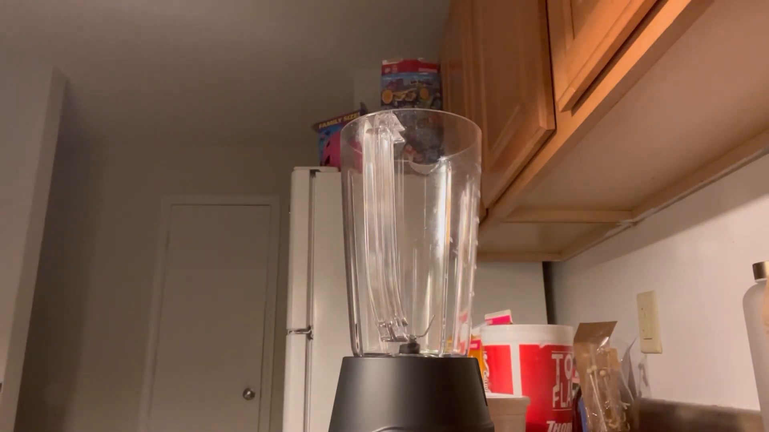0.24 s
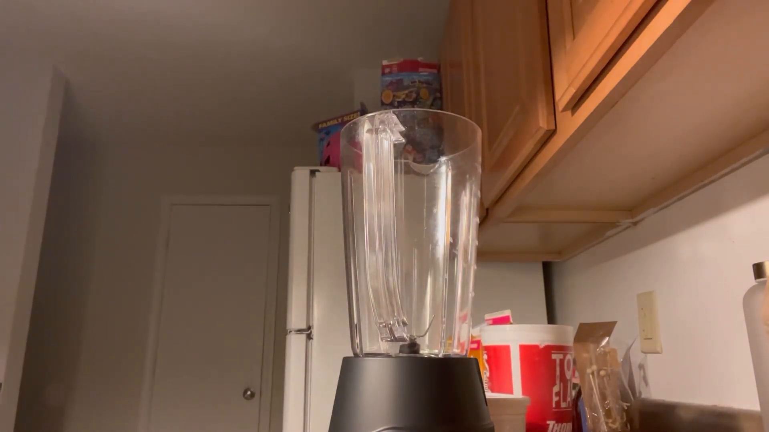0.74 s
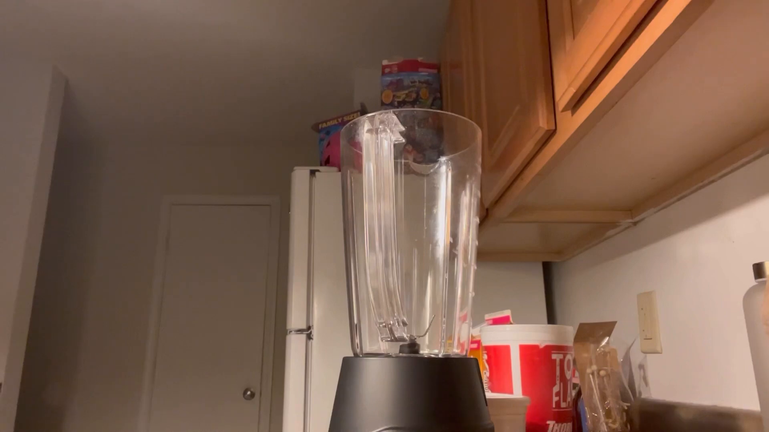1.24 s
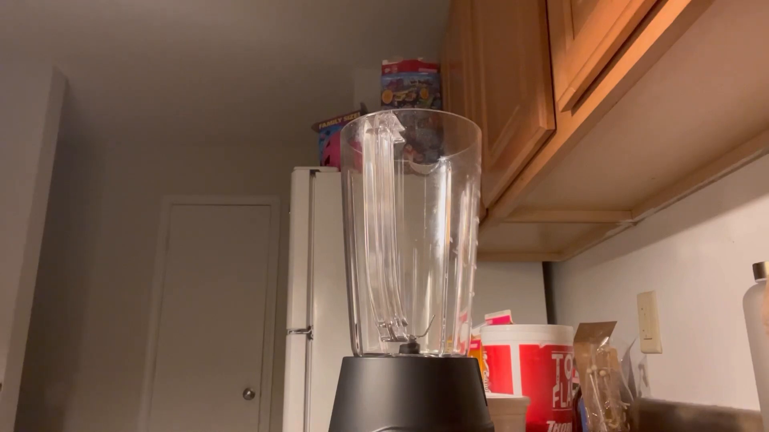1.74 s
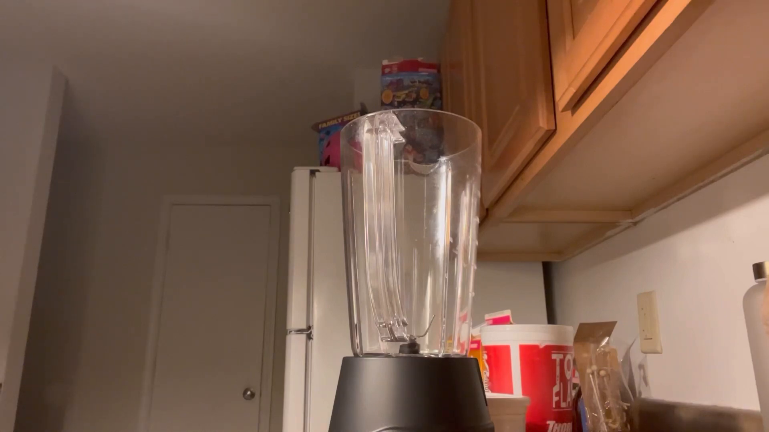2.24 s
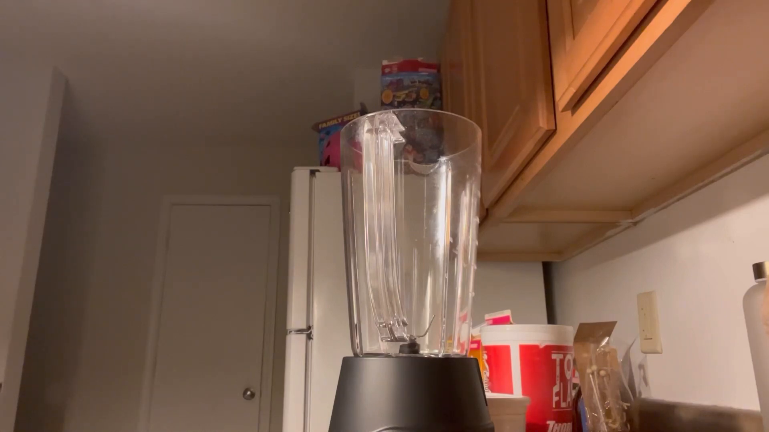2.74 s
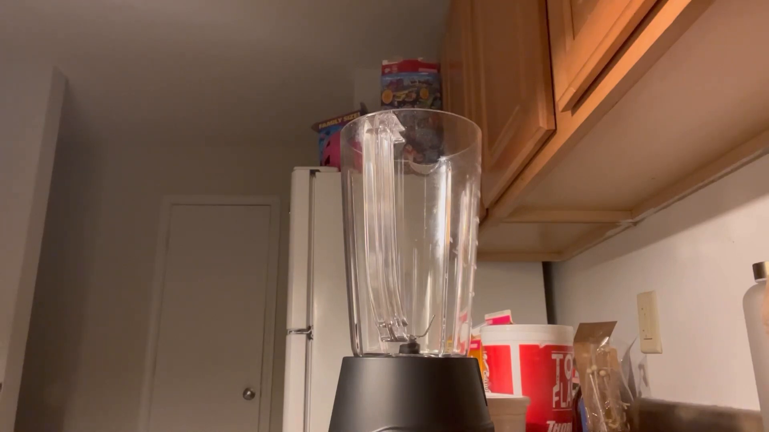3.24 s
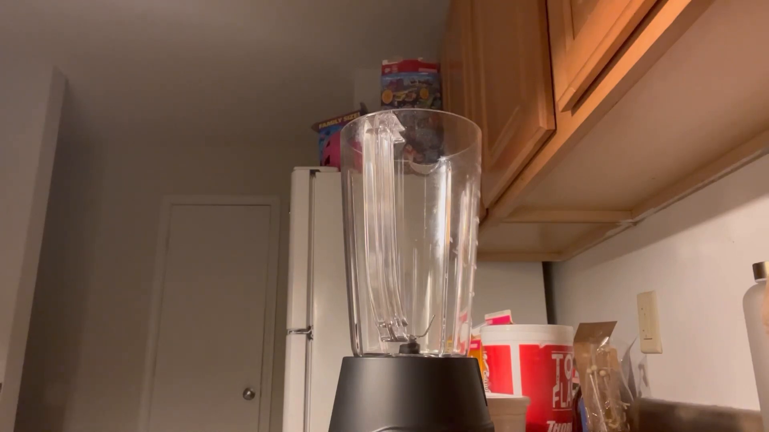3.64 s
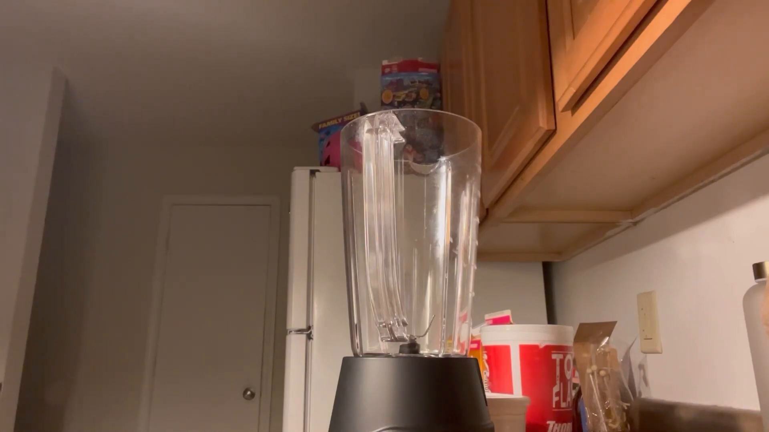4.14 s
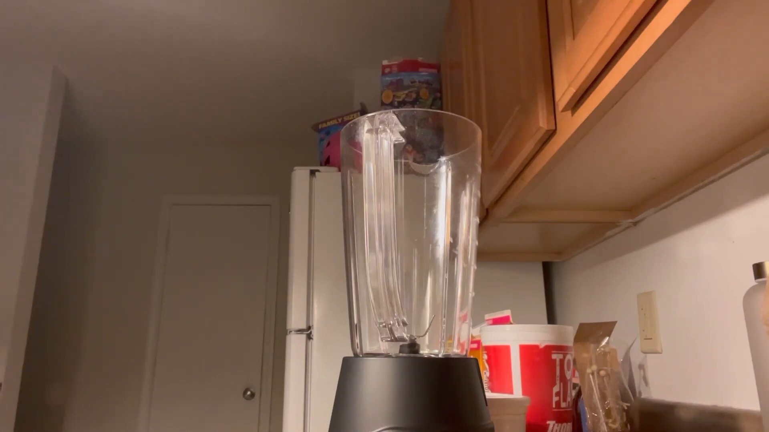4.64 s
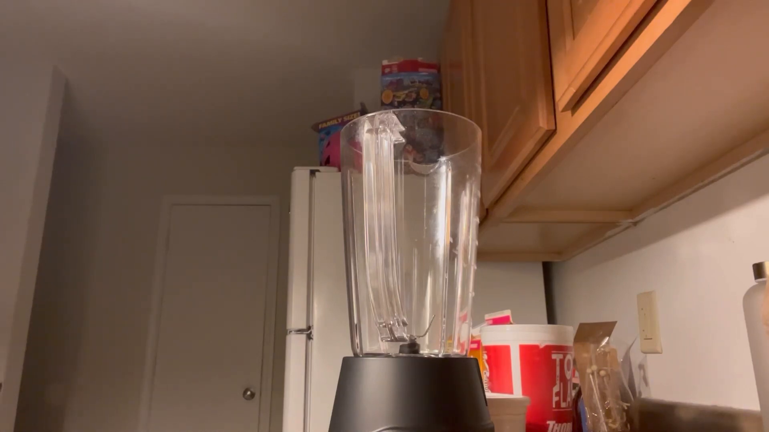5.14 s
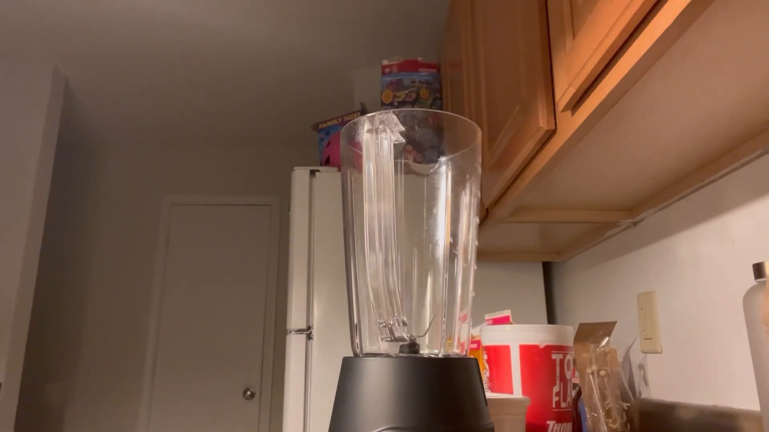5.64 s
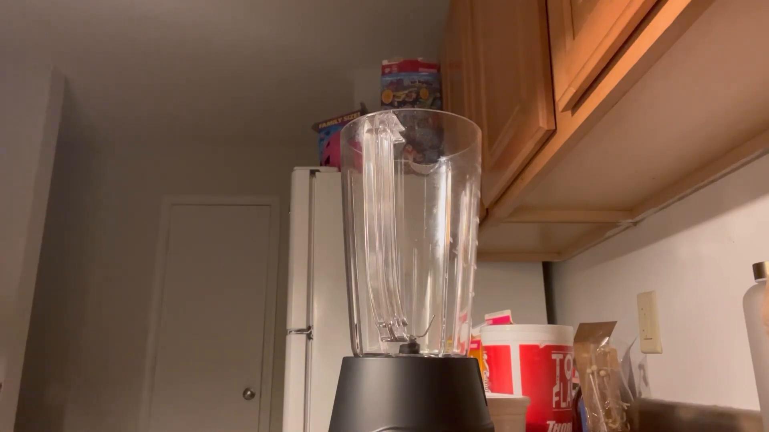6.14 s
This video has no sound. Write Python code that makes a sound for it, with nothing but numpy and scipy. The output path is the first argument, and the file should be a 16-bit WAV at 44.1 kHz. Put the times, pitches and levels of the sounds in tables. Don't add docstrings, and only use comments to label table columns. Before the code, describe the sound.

Cutlery and plastic handles scrape and clatter in a drawer, followed by a near lull, renewed clacking and one loud wooden slam over faint refrigerator rumble.

```python
import sys
import numpy as np
from scipy import signal
from scipy.fft import rfft, irfft, next_fast_len
from scipy.io import wavfile
from scipy.ndimage import uniform_filter1d, map_coordinates

SR = 44100
rng = np.random.default_rng(int(sys.argv[2]) if len(sys.argv) > 2 else 0)


def generate_wav(sig):
    pcm = np.round(np.clip(np.atleast_2d(sig).T, -1, 1) * 32767).astype(np.int16)
    wavfile.write(sys.argv[1], SR, pcm)


def level_to_linear(level):
    exponent = np.asarray(level, float) / 20
    return 10 ** exponent


N = 281530
T = np.arange(SR // 5) / SR

# [f/Hz, width/Hz, level/dB]
BOX_MODES = [(113.2, 17.9, 3), (215, 32, 2), (275, 49.3, 2), (363.4, 55, 1), (385.7, 65, -1.5),
             (466, 89, -4.5), (630, 131, -8.5), (770, 40, -21)]
# [f/Hz, level per Hz/dB]
PLASTIC_COLOUR = [(210, -10.5), (380, 0.5), (520, -4), (800, 0.5), (1000, -2.5), (1500, -4.5), (2300, -5),
                  (3200, -12), (4500, -17.5), (7000, -26), (13000, -101)]
# [f/Hz, level per Hz/dB]
FIZZ_COLOUR = [(2000, -5), (3500, 1), (4800, -2), (6500, -2), (7800, -5.5), (9500, -5.5), (11000, -16),
               (11900, -26), (13200, -20.5), (14200, -20), (15300, -19.5), (15800, -58.5)]
# [f/Hz, width/Hz, level/dB]
HIGH_MODES = [(10770, 1300, -2.5), (12800, 500, -7.5), (13300, 1800, -3.5), (15000, 460, -16)]


def unit(x):
    return x / np.sqrt(np.mean(x ** 2) + 1e-20)


def along(points, hz):
    f, v = np.transpose(points)
    return np.interp(np.log(hz + 1), np.log(f + 1), v)


def wobble(rate):
    knots = rng.standard_normal(int(N * rate / SR) + 4)
    return map_coordinates(knots, [np.arange(N) * rate / SR])


def filtered(x, response):
    m = next_fast_len(N + SR // 2)
    gain = response(np.fft.rfftfreq(m, 1 / SR))
    gain = gain / np.sqrt(np.mean(abs(gain) ** 2, axis=-1, keepdims=True))
    return irfft(rfft(x, m) * gain, m)[..., :N]


def modes(table):
    def response(f):
        total = 0
        for k, (centre, width, db) in enumerate(table):
            damping = 1j * f * width
            total = total + (-1) ** k * level_to_linear(db) * damping / (centre * centre - f * f + damping)
        return total
    return response


def high_response(f):
    return modes(HIGH_MODES)(f) ** 2


def colour(points):
    return lambda f: level_to_linear(along(points, f))


def grit(rate, spread_db):
    hits = rng.random(N) < rate / SR
    return unit(hits * rng.standard_normal(N) * level_to_linear(spread_db * rng.standard_normal(N)))


def add(track, s, sound):
    part = track[round(s * SR):][:len(sound)]
    part += sound[:len(part)]


def burst(length, rise=0.0036):
    lumps = np.repeat(rng.standard_normal(len(T) // 64 + 1), 64)[:len(T)]
    decay = level_to_linear(3.55 * lumps - 60 * T / max(length, .002))
    return rng.standard_normal(len(T)) * decay * (1 - np.exp(-T / min(rise, length / 4)))


def refrigerator():
    # [f/Hz, level per Hz/dB]
    hum = [(12, -55), (20, -25.5), (49, 5), (76, 10.5), (95, -4), (161, -11), (288, -30), (414, -21.5),
           (489, -22), (1160, -46.5), (3930, -51.5), (6300, -48), (9830, -45.5), (10700, -78), (15300, -80)]
    # [f/Hz, level/dB]
    whine = [(59.2, -59), (10551, -104), (11050, -103)]
    hum_db = -56
    sound = level_to_linear(hum_db + 0.47 * wobble(1.2)) * filtered(rng.standard_normal((2, N)), colour(hum))
    for hz, db in whine:
        sound = sound + level_to_linear(db + 2.3 * wobble(7.6)) * np.sin(2 * np.pi * hz * np.arange(N) / SR)
    return sound


def strokes():
    # [start t/s, length t/s, scrape level/dB, box level re scrape/dB, steel level re scrape/dB]
    stroke_table = [(0, 0.23, -59, 0.5, -6), (0.23, 0.24, -58.5, 12.5, -6.5),
                    (0.483, 0.28, -65.5, 10, -8.5), (0.789, 0.11, -62.5, 2, -6),
                    (0.866, 0.087, -60, -8, -2), (0.97, 0.046, -63, 0, 1.5), (1.036, 0.057, -58.5, 5, -9),
                    (1.271, 0.11, -70.5, 14, -6), (1.323, 0.17, -53, 2, -11.5),
                    (1.48, 0.073, -55.5, 3.5, -5), (1.582, 0.32, -64, 6.5, -7), (1.843, 0.16, -62, 11, -6),
                    (2.01, 0.44, -66, 6.5, -3), (2.447, 0.18, -56.5, 10.5, -4.5),
                    (2.617, 0.13, -62.5, 4, 1.5), (2.841, 0.057, -61.5, 6, -6),
                    (3.839, 0.068, -59, -7, -14.5), (3.918, 0.047, -65.5, 10, -15),
                    (4.025, 0.12, -54.5, 3.5, -22), (4.166, 0.1, -60.5, 3.5, -5),
                    (4.29, 0.11, -64.5, 4.5, -2), (4.36, 0.26, -65.5, 3, -3), (4.596, 0.086, -55, 6.5, -25),
                    (4.704, 0.12, -67.5, -5.5, -31), (5.057, 0.07, -65, -3.5, -3),
                    (5.235, 0.14, -49, -0.5, -22), (5.404, 0.079, -52.5, 18, -15),
                    (5.548, 0.17, -65.5, 3, -26), (5.71, 0.39, -74.5, 5.5, -4), (6.087, 0.095, -70, 0, -15),
                    (6.141, 0.15, -69.5, 5.5, -29), (6.284, 0.076, -71, 6.5, -11)]
    rise_s, fall_db_per_s = 0.03, 341
    rest_db, rest_weight_db, rest_steel_db = -87, 8, -3
    s, length, db, weight_db, steel_db = np.transpose(stroke_table)
    t = np.arange(0, N / SR + .002, .002)
    since = t - s[:, None]
    fall = level_to_linear(-fall_db_per_s * np.maximum(since - length[:, None], 0))
    shape = np.clip(since / rise_s, 0, 1) ** 2 * fall
    rest = level_to_linear(rest_db + np.array([[rest_weight_db], [0], [rest_steel_db]]))
    gains = level_to_linear(db + np.array([weight_db, 0 * db, steel_db])) @ shape + rest
    return [np.interp(np.arange(N) / SR, t, g) for g in gains]


def sliding():
    # [f/Hz, level per Hz/dB]
    counter = [(25, -22.5), (45, -8), (62, 5.5), (85, -2), (110, -3), (160, -69)]
    shake_db, shake_wobble_db = -51.5, 1.5
    shake_follows, shake_lag_s = 0.2, 0.33
    on_box, on_plastic, on_steel = strokes()
    slow_drive = uniform_filter1d(on_box, size=int(shake_lag_s * SR) + 1) / level_to_linear(-53.5)
    shake = level_to_linear(shake_db + shake_wobble_db * wobble(5)) * slow_drive ** shake_follows
    worktop = shake * filtered(rng.standard_normal(N), colour(counter))
    jerk = wobble(25)
    box = on_box * level_to_linear(2.94 * wobble(15)) * filtered(grit(500, 2.25), modes(BOX_MODES))
    scrape = on_plastic * level_to_linear(1.7 * jerk) * filtered(grit(700, 4.7), colour(PLASTIC_COLOUR))
    fizz_gain = on_steel * level_to_linear(1.4 * jerk + 0.453 * wobble(23))
    fizz = fizz_gain * filtered(grit(800, 4.6), colour(FIZZ_COLOUR))
    edges = on_steel * level_to_linear(-19.5 + 2.9 * wobble(30)) * filtered(grit(600, 4), high_response)
    return worktop + box + scrape + fizz + edges


def thuds():
    # [t/s, peak level/dB, ring f/Hz, t60/s]
    blows = [(0.004, -30.5, 125, 0.049), (0.049, -39.5, 226, 0.096), (0.186, -37.5, 215, 0.079),
             (0.284, -36.5, 227, 0.084), (0.358, -55, 288, 0.06), (0.428, -37.5, 153, 0.067),
             (0.689, -38, 103, 0.04), (0.882, -35, 215, 0.062), (.904, -31.5, 151, 0.038),
             (1.099, -38, 148, 0.086), (1.16, -46.5, 266, 0.086), (1.065, -40, 280, 0.12),
             (1.399, -18.5, 250, 0.036), (1.415, -33.5, 203, .09), (1.44, -42, 276, 0.071),
             (1.519, -38, 235, 0.056), (1.721, -51, 232, 0.25), (1.891, -32.5, 307, 0.073),
             (2.2, -42, 142, 0.062), (2.49, -33.5, 221, 0.068), (2.673, -31, 275, 0.04),
             (3.854, -38.5, 234, 0.076), (3.929, -41, 329, 0.16), (4.209, -34, 215, 0.065),
             (4.232, -38.5, 159, 0.071), (4.409, -41.5, 311, 0.083), (4.42, -34, 248, 0.045),
             (4.445, -37.5, 317, 0.05), (4.636, -34, 197, 0.032), (5.117, -34.5, 275, 0.039),
             (5.184, -19, 250, 0.059), (5.188, -12, 255, 0.064), (5.2, -22.5, 120, 0.14),
             (5.233, -25, 282, .03), (5.207, -14.5, 268, 0.043), (5.354, -26, 264, 0.12),
             (5.446, -19, 113.6, 0.14), (5.509, -23.5, 98.5, 0.16), (5.5, -30, 200, 0.05),
             (5.54, -35, 226, 0.073), (5.748, -40, 106, 0.059), (6.178, -42.5, 240, 0.074)]
    # [t/s, peak level/dB, ring f/Hz, t60/s]
    more_blows = [(2.491, -34, 515, 0.04), (2.535, -36, 580, 0.08), (2.599, -44, 530, 0.064),
                  (2.699, -52, 468, 0.069), (5.23, -18, 354, 0.11), (5.445, -27, 650, 0.042),
                  (5.58, -36, 693, 0.034), (1.42, -25.5, 117, 0.12), (3.8, -49, 113, 0.08),
                  (5.19, -17, 173, 0.12), (5.92, -42, 100, 0.1), (5.447, -15.5, 245.4, 0.067),
                  (4.372, -41, 290, 0.27), (2.56, -38, 777, 0.037), (4.632, -36, 205, 0.045)]
    second_ratio, second_db = (1.212, 1.5), -7.5
    panel, shake = np.zeros((2, N))
    for s, db, hz, t60 in list(blows) + list(more_blows):
        neighbour_hz = hz * rng.uniform(*second_ratio)
        swing = np.sin(2 * np.pi * hz * T) + level_to_linear(second_db) * np.sin(2 * np.pi * neighbour_hz * T)
        decay = level_to_linear(db - 0.5 - 70 * T / max(t60, .01))
        add(panel, s, decay * swing * (1 - np.exp(-T / 0.0016)))
        add(shake, s, level_to_linear(db) * min(hz / 200, 1) * burst(0.65 * t60))
    return panel + filtered(shake, lambda f: modes(BOX_MODES)(f) / (1 + 1j * f / 1100) ** 2)


def contacts():
    # [t/s, peak level/dB, ring f/Hz, brightness level/dB]
    clack_table = [(.084, -57, 684, -8), (.165, -42.5, 1880, -7.5), (.295, -44.5, 900, -5.5),
                   (.385, -40, 1660, -29), (.529, -46, 940, -5.5), (.686, -48, 1100, -23),
                   (.769, -54, 3020, -3), (1.507, -33, 1074, -16.5), (1.548, -40, 2270, -6.5),
                   (1.773, -44.5, 925, -15.5), (1.843, -46, 830, -14), (1.868, -34, 945, -15),
                   (1.893, -29.5, 1290, -15), (1.908, -33, 2010, -13), (1.989, -38, 1237, -10.5),
                   (2.318, -44.5, 2920, -24), (2.345, -41.5, 990, -24), (2.362, -45, 1700, -24),
                   (4.189, -36, 800, -10.5), (4.627, -31, 870, -15.5), (5.105, -48.5, 2640, 0),
                   (5.462, -38, 2050, -25), (5.509, -46, 650, -1), (5.584, -45, 630, -26),
                   (5.9, -68, 610, 6), (.431, -32, 997, -19), (2.241, -38, 1116, -18),
                   (2.28, -46, 1210, -24)]
    # [t/s, peak level/dB, ring f/Hz, brightness level/dB]
    ringers = [(.234, -49, 1020, -14), (.843, -52.5, 1266, -3), (1.285, -56.5, 925, -37),
               (1.399, -50, 950, -25), (1.929, -42, 1350, -8.5), (2.168, -47.5, 995, -25),
               (2.489, -52, 1060, -30), (2.55, -39.5, 600, -18.5), (4.369, -38, 778, -7.5),
               (5.114, -35, 766, -15), (5.359, -33.5, 740, -33), (5.943, -65, 2690, 12)]
    # [t/s, peak level/dB, ring f/Hz, brightness level/dB]
    muffled = [
        (.004, -42, 630, -18.5),
        (.554, -41.5, 2250, -11.5),
        (1.057, -45, 860, -13),
        (1.329, -51.5, 1010, -10),
        (2.61, -57, 695, -31),
        (3.851, -40, 1015, -27),
        (4.049, -39.5, 1470, -20),
        (4.118, -31.5, 2140, -12.5),
        (5.437, -28.5, 1730, -12.5),
    ]
    # [t/s, peak level/dB, ring f/Hz, rattle t/s, ring level/dB]
    slam = [
        (5.171, -32.5, 2160, 0.033, -14),
        (5.185, -18, 435, 0.032, -9),
        (5.199, -5.5, 2540, 0.008, -38),
        (5.207, -13.5, 1970, 0.016, -33.5),
        (5.219, -16.5, 770, 0.011, -9),
        (5.233, -22, 1210, .014, 1),
        (5.262, -26, 770, 0.033, -1.5),
    ]
    # [t/s, peak level/dB, ring f/Hz, rattle t/s, ring level/dB]
    rustles = [
        (2.826, -54.5, 2200, 0.14, -14),
        (2.86, -54.5, 3300, 0.1, -8),
        (1.348, -45.5, 920, 0.047, 3),
        (5.955, -60, 4360, 0.078, 17),
    ]
    rows = []
    for table, rattle_s, ring_db in ((clack_table, 0.029, -4.5), (ringers, 0.03, 2.5), (muffled, 0.03, -7)):
        rows += [(*row, rattle_s, ring_db) for row in table]
    for table, bright_db in ((slam, -22.5), (rustles, -7.5)):
        rows += [(s, db, hz, bright_db, rattle_s, ring_db) for s, db, hz, rattle_s, ring_db in table]
    return rows


def clacks():
    ring_cycles = 49
    dull, bright, ring = np.zeros((3, N))
    for s, db, hz, bright_db, rattle_s, ring_db in contacts():
        soft = np.exp(-2 * np.pi * 5 * hz / SR)
        touch = signal.lfilter([(1 - soft) ** 2], [1, -2 * soft, soft ** 2], burst(rattle_s))
        add(dull, s, level_to_linear(db + 4.5) * touch)
        add(bright, s, level_to_linear(db + bright_db + 12.5) * burst(0.78 * rattle_s))
        ratios = np.array([[1], [rng.uniform(1.3, 4.0)], [rng.uniform(2.5, 2.55)]])
        partials = np.sum(np.sin(2 * np.pi * hz * ratios * T) / ratios ** 3.8, axis=0)
        swing = level_to_linear(db + ring_db - 60 * T * hz / ring_cycles) * (1 - np.exp(-T / 0.0004))
        add(ring, s, swing * partials)
    return filtered(dull, colour(PLASTIC_COLOUR)) + filtered(bright, colour(FIZZ_COLOUR)) + ring


def taps():
    # [t/s, peak level/dB, ring f/Hz, t60/s]
    knocked_once = [(.063, -56, 824, 0.018), (.165, -44.5, 2000, 0.013), (.35, -34.5, 310, 0.05),
                    (.385, -49, 1680, .04), (.637, -51, 999, .02), (.64, -47, 302, .05),
                    (.89, -57, 5100, .03), (1.772, -53, 934, .025), (2.169, -60, 1000, 0.015),
                    (2.321, -53, 942, .02), (2.517, -35, 256, .05), (2.575, -33, 293, .06),
                    (2.625, -36, 283, .05), (2.675, -44.5, 281, 0.045), (3.804, -40, 6100, .03),
                    (3.806, -39, 10800, .02), (3.805, -50, 4480, .02), (3.805, -43.5, 2300, .02),
                    (4.05, -58, 985, .02), (4.05, -53.5, 3300, .012), (4.19, -41, 2370, .015),
                    (4.191, -43, 4280, .015), (4.19, -47, 780, 0.033), (4.372, -44, 4480, .02),
                    (4.376, -35, 777, 0.043), (4.413, -33, 265, 0.027), (4.412, -42, 997, .025),
                    (4.53, -38.5, 110, 0.074), (4.627, -46, 900, .06), (4.637, -34, 234, 0.051),
                    (4.645, -40, 2110, 0.023), (4.662, -33.5, 135, 0.056), (5.179, -31, 848, 0.023),
                    (5.192, -18.5, 1544, 0.02), (5.199, -16.5, 1980, 0.011), (5.2, -16, 2750, 0.0087),
                    (5.209, -18, 149, 0.085), (5.255, -34, 201, 0.046), (5.278, -30, 300, .04),
                    (5.446, -31, 800, 0.051), (5.458, -37.5, 1980, .025), (5.466, -20.5, 247, 0.039),
                    (5.514, -24.5, 150, 0.044), (5.552, -32, 160, 0.052), (5.9, -58, 4400, .015),
                    (5.943, -60, 6460, .05), (6.168, -59, 1390, 0.027), (6.33, -67, 6100, .03)]
    # [t/s, peak level/dB, ring f/Hz, t60/s]
    more_knocked = [(.005, -41, 600, .05), (.045, -46, 700, .04), (1.4, -49, 2100, .05), (1.508, -43, 3480, .02),
                    (2.345, -48, 1050, .015), (2.362, -47, 1000, .015), (2.49, -43, 1000, .02),
                    (4.138, -39, 2250, .02), (4.215, -37.5, 230, 0.072), (4.371, -29, 1058, 0.027),
                    (4.392, -42, 1110, .02), (5.357, -29, 272, .06), (5.585, -39, 634, .06),
                    (5.49, -33, 776, 0.045), (5.85, -49.5, 190, 0.11), (6.27, -52, 190, .1)]
    rise_cycles = 0.54
    out = np.zeros(N)
    for s, db, hz, t60 in list(knocked_once) + list(more_knocked):
        ring = level_to_linear(db - 60 * T / max(t60, .004)) * np.sin(2 * np.pi * hz * T)
        add(out, s, ring * (1 - np.exp(-T * hz / rise_cycles)))
    return out


def snaps():
    # [t/s, peak level/dB, ring f/Hz, t60/s]
    hard_touches = [(.431, -34.5, 926, 0.026), (.431, -42, 2510, 0.014), (.446, -37.5, 1660, 0.028),
                    (.458, -43.5, 1020, 0.018), (.843, -50, 2290, .02), (.843, -57, 1270, .03),
                    (.844, -56, 4700, .03), (1.058, -53, 2600, .015), (1.348, -55, 1000, .02),
                    (1.508, -44.5, 2320, 0.022), (1.867, -43.5, 4650, .02), (1.869, -42, 3800, .02),
                    (1.893, -34, 2330, 0.022), (1.909, -34, 2250, 0.011), (1.938, -53, 5870, .05),
                    (2.241, -53.5, 2170, .02), (2.829, -56, 1150, 0.028), (5.214, -26.5, 1240, 0.024),
                    (2.85, -48, 2990, 0.046), (3.211, -70, 2780, 0.015), (3.211, -65, 5900, .02),
                    (3.689, -64, 6030, .02), (4.048, -59, 2820, .015), (4.117, -38.5, 6080, .02),
                    (4.12, -41, 2670, .02), (4.133, -43, 5380, .02), (4.371, -40.5, 1036, 0.03),
                    (4.626, -40.5, 3020, 0.011), (4.629, -53, 950, 0.039), (5.189, -22.5, 780, 0.044),
                    (5.209, -23.5, 1900, .015), (5.222, -23, 1250, 0.021), (5.437, -29.5, 1230, 0.028),
                    (5.437, -33.5, 2730, .015)]
    click_db, click_s = -6.5, .004
    click, ring = np.zeros((2, N))
    for s, db, hz, t60 in hard_touches:
        add(click, s, level_to_linear(db + click_db - 60 * T / click_s) * rng.standard_normal(len(T)))
        add(ring, s, level_to_linear(db - 60 * T / max(t60, .004)) * np.sin(2 * np.pi * hz * T))
    return ring + filtered(click, colour(PLASTIC_COLOUR))


def ticks():
    # [t/s, peak level/dB, high sheen level re peak/dB, rattle t/s]
    steel_touches = [(0.77, -59, -22, 0.015), (1.3296, -49, -23, 0.011), (1.3718, -49.5, -10, 0.017),
                     (1.5435, -43, -8, 0.028), (1.845, -56.5, -9, 0.037), (1.869, -50.5, -3, 0.028),
                     (1.93, -46, -2.5, 0.02), (1.977, -48.5, -15.5, 0.033), (3.0949, -63, -17, 0.017),
                     (3.176, -61, -16, 0.013), (3.21, -52, -15, 0.0085), (3.366, -55.5, -19, 0.023),
                     (3.418, -56.5, -11.5, 0.016), (3.688, -55.5, -19.5, 0.022), (3.803, -24, -10.5, 0.014),
                     (3.8208, -51.5, -13.5, 0.013), (4.1185, -28.5, -44, 0.013), (5.946, -53.5, -37, 0.036),
                     (3.789, -58, -32.5, 0.03)]
    # [f/Hz, width/Hz, level/dB]
    tick_modes = [(2310, 550, -12), (3340, 400, -7.5), (4540, 390, -6.5), (6100, 620, 0),
                  (8460, 720, -2.5), (9520, 700, -8)]
    touch, edge = np.zeros((2, N))
    for s, db, edge_db, rattle_s in steel_touches:
        add(touch, s, level_to_linear(db + 7.5) * burst(rattle_s))
        add(edge, s, level_to_linear(db + edge_db + 14.0) * burst(rattle_s))
    return filtered(touch, modes(tick_modes)) + filtered(edge, high_response)


def free_spoon():
    # [f/Hz, level/dB, t60/s]
    spoon_modes = [(3700, 4, .15), (5240, 10, 0.07), (7140, -3.5, 0.11)]
    # [t/s, level/dB]
    spoon_hits = [
        (.775, -69),
        (0.888, -72),
        (.912, -68),
    ]
    out = np.zeros(N)
    for s, db in spoon_hits:
        for hz, mode_db, t60 in spoon_modes:
            decay = level_to_linear(db + mode_db + rng.normal(0, 1.5) - 60 * T / min(t60, .3))
            add(out, s, decay * np.sin(2 * np.pi * hz * T))
    return out


def groan():
    start_s, peak_s, hz, peak_db = 2.488, 2.558, 421, -27
    swell_db_per_s, fall_db_per_s = 178, 272
    t = np.arange(N) / SR
    swell = swell_db_per_s * np.maximum(peak_s - t, 0)
    fall = fall_db_per_s * np.maximum(t - peak_s, 0)
    level = level_to_linear(peak_db - swell - fall + 6.7 * wobble(41.06))
    return np.clip((t - start_s) / 0.0091, 0, 1) * level * np.sin(2 * np.pi * hz * t)


def crack():
    # [f/Hz, width/Hz, level/dB]
    crack_modes = [(2100, 1000, 0), (2980, 1540, -2)]
    start_s, peak_db, length_s = 5.199, -2.5, 0.017
    edge = np.zeros(N)
    add(edge, start_s, level_to_linear(peak_db) * burst(length_s))
    return filtered(edge, lambda f: modes(crack_modes)(f) ** 2)


def kitchen(x, direct_db, near_db, far_db):
    # [f/Hz, t60/s]
    cabinet_t60 = [(100, 0.16), (1000, 0.13), (10000, 0.16)]
    # [f/Hz, t60/s]
    wall_t60 = [(100, 0.42), (500, 0.67), (2000, 0.52), (6000, 0.59), (14000, 0.26)]
    hop = SR // 6
    out, padded = np.zeros((2, N + 2 * SR)), np.pad(x, (hop, 2 * hop))
    fade = np.sin(np.pi * np.arange(2 * hop) / (2 * hop))
    for at in range(0, N + hop, hop):
        hz, t, z = signal.stft(rng.standard_normal((2, SR // 2)), SR, nperseg=256)
        near = level_to_linear(-60 * t / along(cabinet_t60, hz)[:, None])
        far = level_to_linear(-60 * t / along(wall_t60, hz)[:, None])
        tail = signal.istft(z * (level_to_linear(near_db) * near + level_to_linear(far_db) * far), SR, nperseg=256)[1]
        tail = tail * np.linspace(1, 0, tail.shape[1]) ** .5
        wet = signal.fftconvolve((padded[at:at + 2 * hop] * fade)[None], tail, axes=1)
        out[:, at:at + wet.shape[1]] += wet
    return out[:, hop:N + hop] + level_to_linear(direct_db) * x


def scene():
    blows, hard, knocked = thuds(), snaps(), taps()
    drawer = sliding() + clacks() + ticks() + blows + hard + knocked + free_spoon()
    through_worktop = level_to_linear(-3.5) * blows + groan() + crack() + level_to_linear(0.5) * hard + level_to_linear(-0.5) * knocked
    room = kitchen(drawer, direct_db=-9.0, near_db=-31.5, far_db=-35)
    return room + through_worktop * [[1], [0]] + refrigerator()


def top_cut(x):
    return signal.sosfilt(signal.butter(12, 15490, fs=SR, output="sos"), x)


def record(dry):
    # [f/Hz, likeness 0-1]
    likeness = [(60, 0.97), (150, 0.67), (300, 0.86), (420, 0.91), (650, 0.84), (850, 0.38), (3000, 0.18),
                (7000, 0.36), (7800, 0.97), (9800, 0.077), (10600, 0.73), (13000, 0.82), (13500, .6),
                (14300, 1)]
    # [f/Hz, phase/rad]
    phase_lead = [(60, 0.15), (130, 0.87), (300, 1.12), (430, 2.68), (600, 3.24), (750, 3.68), (1050, 4.3),
                  (2400, 4.7), (3800, 8.95), (7000, 16.8), (7750, 14.76), (10600, 18), (13000, 19),
                  (14300, 22.5)]
    # [f/Hz, level difference/dB]
    balance = [(60, -3.5), (150, 0.5), (380, 0.5), (950, 2), (2370, 2.5), (5940, -4), (14900, 4)]
    m = next_fast_len(N + 8192)
    hz = np.fft.rfftfreq(m, 1 / SR)
    alike = np.clip(along(likeness, hz), 0, 1)
    tilt = level_to_linear(along(balance, hz) / 2)
    microphone = hz ** 2 / np.sqrt(hz ** 4 + 40. ** 4) * (hz < 15500)
    left, own = rfft(dry, m) * microphone
    right = alike * np.exp(-1j * along(phase_lead, hz)) * left + np.sqrt(1 - alike ** 2) * own
    mix = irfft([left * tilt, right / tilt], m)[:, :N]
    return top_cut(mix)


dry = scene()
out = record(dry)
generate_wav(out)
```